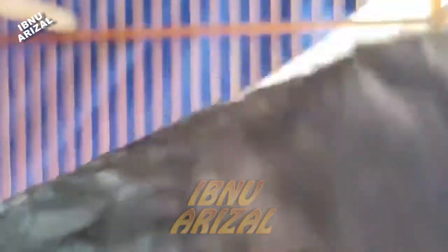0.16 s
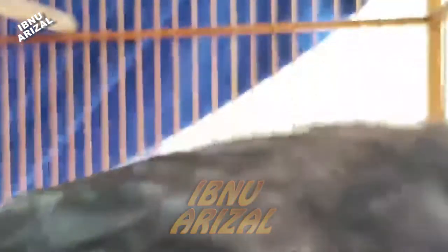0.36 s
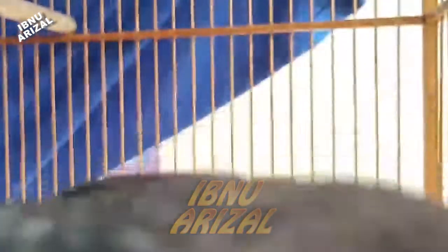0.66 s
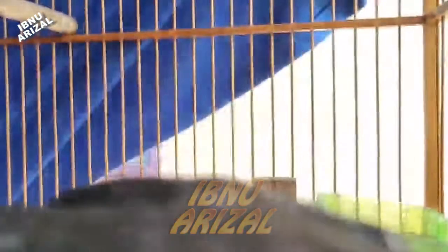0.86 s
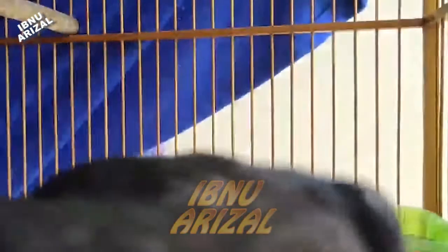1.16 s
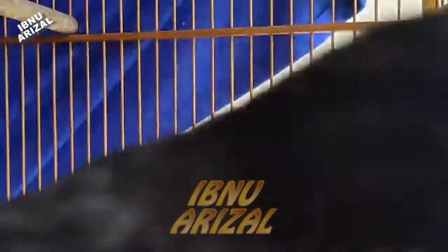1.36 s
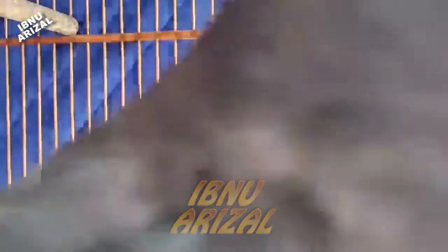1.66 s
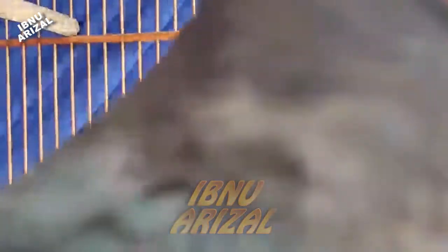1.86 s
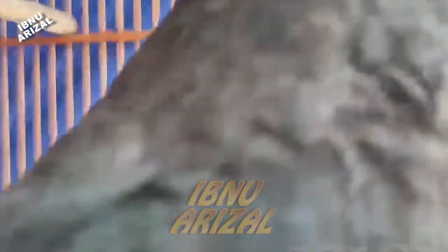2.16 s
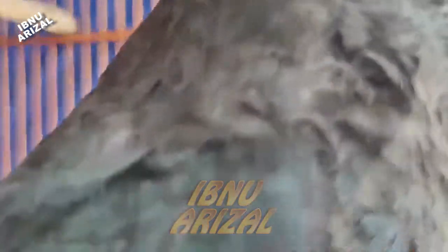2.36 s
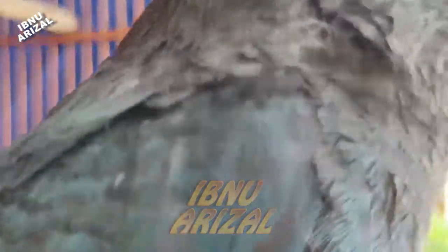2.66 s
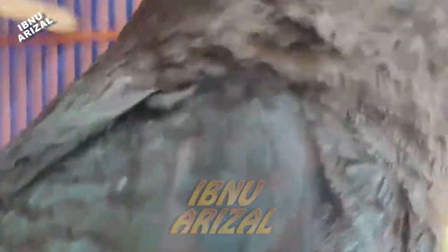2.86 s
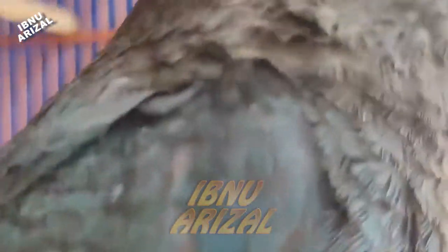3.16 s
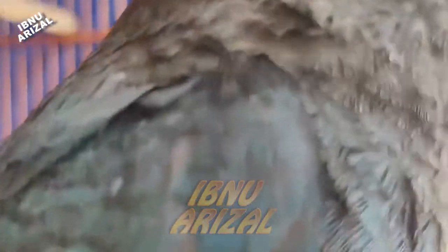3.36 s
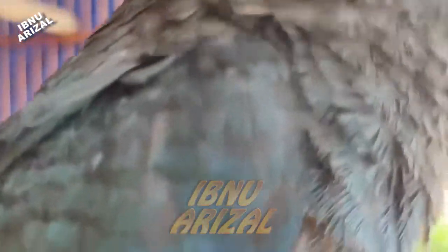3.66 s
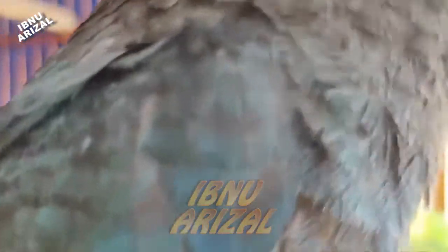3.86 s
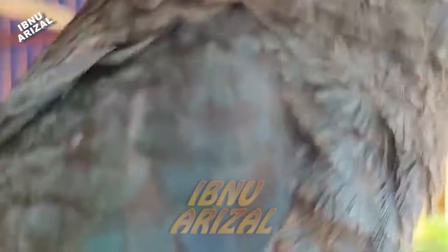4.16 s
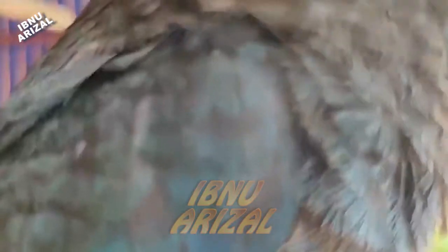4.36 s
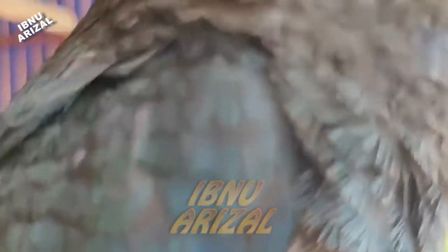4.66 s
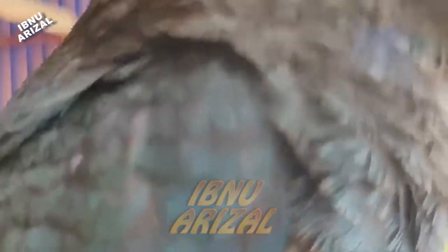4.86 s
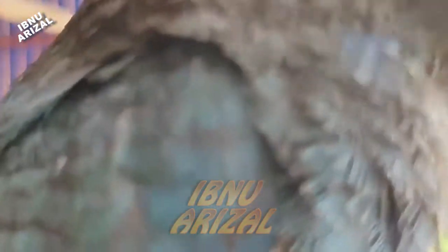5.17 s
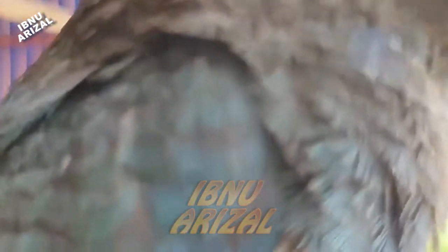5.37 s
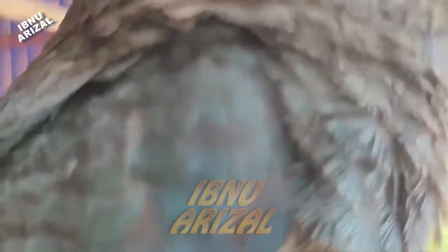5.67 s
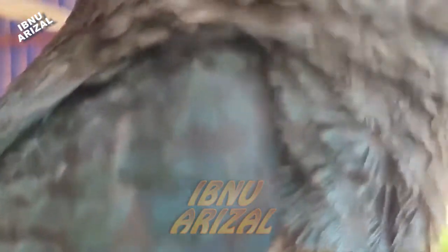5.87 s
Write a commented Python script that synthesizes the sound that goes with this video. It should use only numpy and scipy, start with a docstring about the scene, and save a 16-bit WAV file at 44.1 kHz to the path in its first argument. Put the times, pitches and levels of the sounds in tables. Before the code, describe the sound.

Rapid raspy squawks from one bird, each a few hundredths of a second long and dropping in pitch, with tiny sips of air between. Bright and hissy first, then rounder before a short pause; muffled notes follow, then uneven chatter that steadies and brightens. Close microphone, small live room, soft movement rumble and a quiet noise floor.

```python
"""A harsh rattle, about ten notes a second, right at the microphone: a caged bird in a small room, with one
short pause and a dull, scooping restart. Uneven membrane pulses and gated air fall in pitch through resonances
of windpipe, throat and beak, plus a hiss band; wider beaks sound brighter and raspier. A tiny sip of air
precedes the notes. Bars and body scatter the treble, the room rings, and low rumble and a noise floor lie below."""
import sys
import numpy as np
from scipy import signal
from scipy.fft import rfft, irfft, next_fast_len
from scipy.io import wavfile
from scipy.ndimage import uniform_filter1d, minimum_filter1d

SR = 44100
rng = np.random.default_rng(int(sys.argv[2]) if len(sys.argv) > 2 else 0)


def file_out(sig):
    """Save sig as 16-bit WAV at sys.argv[1]."""
    # one column per channel
    cols = np.atleast_2d(sig).T
    # limit, then scale
    lim = np.clip(cols, -1, 1)
    pcm = np.round(lim * 32767).astype(np.int16)
    wavfile.write(sys.argv[1], SR, pcm)


N = 265570
LEAD = SR // 4  # samples kept ahead of the opening, for the rattle already under way

# rumble of the bird stirring close by: (time [s], level [dB])
STIR = [(0, -51), (.25, -46), (.7, -61), (2.6, -65), (3.8, -66), (4.7, -74), (5.85, -56)]
USUAL_PITCH_HZ, WIDE_BEAK_DB = 1200, -19


def from_db(db):
    """Decibels to gain."""
    return 10 ** (np.asarray(db) / 20)


def rms_one(x):
    """Scale to rms 1."""
    return x / np.sqrt(np.mean(x ** 2) + 1e-20)


def along(rows, at):
    """Read a two-column table along straight lines."""
    return np.interp(at, *np.transpose(rows))


def at_hz(points, hz):
    """Read a spectrum on a log-frequency axis."""
    points = np.array(points)
    return np.interp(np.log(hz + 1e-9), np.log(points[:, 0]), points[:, 1])


def colour(x, spectrum):
    """Filter a sound by a smooth spectrum."""
    n = x.shape[-1]
    size = next_fast_len(n + 2048)
    gain = from_db(at_hz(spectrum, np.fft.rfftfreq(size, 1 / SR)))
    return irfft(rfft(x, size) * gain, size)[..., :n]


def band(x, low_hz, high_hz, order=3):
    """Butterworth band-pass."""
    edges = [low_hz, min(high_hz, SR / 2 - 100)]
    return signal.sosfilt(signal.butter(order, edges, "band", fs=SR, output="sos"), x)


def waver(size, rate_hz):
    """Smooth random drift with rms 1: noise through two equal one-pole low-passes."""
    r = np.exp(-2 * np.pi * rate_hz / SR)
    drift = signal.lfilter([1], [1, -2 * r, r * r], rng.standard_normal(2 * size))
    return rms_one(drift[size:])  # the first half lets the filter settle


def add(out, s, x):
    """Mix a sound in at time s."""
    i = max(LEAD + round(s * SR), 0)
    x = x[..., :max(out.shape[1] - i, 0)]
    out[:, i:i + x.shape[-1]] += x


def posture(s, pitch_hz, beak_db):
    """Length, windpipe level, hiss level and throat centre that go with a note's pitch and gape."""
    # slow course of the rattle at usual pitch and gape:
    # (time [s], note length [s], windpipe level [dB], hiss level [dB])
    course = [(0.05, 0.035, -22.6, -36.8), (0.6, 0.039, -22.5, -37.7), (1.0, 0.033, -20.5, -35.6),
              (1.4, 0.038, -19.7, -48.4), (2.3, 0.034, -24.1, -47.9), (3.3, 0.031, -21.4, -45.7),
              (4.0, 0.034, -21.5, -46.2), (4.8, 0.033, -23.7, -43.8), (5.95, 0.037, -25.4, -42.2)]
    times, *columns = np.transpose(course)
    length, windpipe_db, hiss_db = (np.interp(s, times, column) for column in columns)
    octaves = np.log2(pitch_hz / USUAL_PITCH_HZ)
    gape_db = beak_db + 22  # against the usual beak level of -22 dB
    # a higher note rings more in the windpipe
    windpipe_db = windpipe_db + 4.5 * octaves - .03 * gape_db
    # a lower, slacker note and a wider beak let out more hiss
    hiss_db = hiss_db - 20 * octaves + .58 * gape_db
    # the throat resonance climbs with pitch and gape
    throat_hz = 2570 + 700 * octaves + 15 * gape_db
    return length, windpipe_db, hiss_db, throat_hz


def lateness(pitch_hz, beak_db, half_shut_db=-27, slack_hz=1070):
    """How late the beak opens, 0-1: latest on a taut note with the beak half shut."""
    shut = np.interp(beak_db, [half_shut_db, WIDE_BEAK_DB], [1, 0])
    return shut * np.interp(pitch_hz, [slack_hz, USUAL_PITCH_HZ], [0, 1])


def glide(s, u, late, restart_s=1.271, recovery_s=.31, quick_fall=-.2, late_fall=.15):
    """Pitch ratio at shares u of a note: a fall, blended with a scoop that fades after the restart."""
    # course of a harsh note: (share of its length [0-1], pitch [ratio])
    harsh_course = [(0, 1.22), (.12, 1.07), (.3, 1.0), (.52, .93), (.72, .79), (1.0, .53)]
    # a scooping note dips and recovers before it sinks: (share of its length [1 = whole], pitch [ratio])
    scoop_course = [(0, 1.6), (.13, 1.08), (.28, .93), (.52, 1.07), (.75, .95), (1.1, .6)]
    scoop = np.clip(1 - ((s - restart_s) / recovery_s) ** 2, 0, 1) * (s > restart_s - .05)
    fall = quick_fall + late * (late_fall - quick_fall)  # extra fall over a note, octaves
    plain = along(harsh_course, u) * 2 ** (-fall * (np.minimum(u, 1) - .3))
    return (1 - scoop) * plain + scoop * along(scoop_course, u)


def syrinx(pitch_hz, rough, jitter=.065, jitter_hz=600, shimmer_db=3.5, gating=.5):
    """Uneven pulses of the membranes, and the turbulence that each pulse lets through."""
    size = len(pitch_hz)
    hz = pitch_hz * (1 + jitter * rough * waver(size, jitter_hz))
    phase = 2 * np.pi * np.cumsum(hz) / SR
    k = np.arange(1, 17)[:, None]  # partial numbers
    audible = k * hz < SR / 2
    partials = np.cos(k * phase + rng.uniform(0, 2 * np.pi, k.shape)) * audible
    pulses = partials.sum(axis=0) * from_db(shimmer_db * rough * waver(size, 200))
    air = rng.standard_normal(size) * (1 + gating * np.cos(phase))
    # roughness moves power from pulses to air
    return np.sqrt(1 - rough) * rms_one(pulses), np.sqrt(rough) * rms_one(air)


def throat_resonance(hz, bright_db, unsteady, late, widen_db=1.1, reach_db=.14, late_holds=.8):
    """The throat band slides and widens with gape; a narrow beak, steady note or late beak limits its rise."""
    # throat at a reference centre: (low edge [Hz], high edge [Hz], centre [Hz], width [Hz],
    # rise over a note [octaves], rasp [dB], response to pressure [dB/dB], response to beak opening [ratio],
    # left port's lag before the turn [s], lag after it [s], left-right [dB])
    throat = (1850, 3900, 2470, 600, .32, -3, .6, .5, .000048, .000122, .1)
    low, high, centre, width = np.array(throat[:4]) * hz / 2550
    gape = max(bright_db, 0)
    rise = throat[4] * np.clip(1 + bright_db / 14, 0, 1) * unsteady * (1 - late_holds * late)
    high = high * from_db(reach_db * gape)
    width = width * from_db(widen_db * gape) * np.sqrt(unsteady)
    return (low, high, centre, width, rise, *throat[5:])


def beak_resonance(beak_db):
    """A half-shut beak holds back the top of its band."""
    # beak fully open: (low edge [Hz], high edge [Hz], centre [Hz], width [Hz],
    # rise over a note [octaves], rasp [dB], response to pressure [dB/dB], response to beak opening [ratio],
    # left port's lag before the turn [s], lag after it [s], left-right [dB])
    beak = (3900, 7700, 6350, 1350, .12, -3.5, 1.4, .7, .000042, .000106, 1.0)
    # the upper edge climbs with gape: (beak level [dB], share of the full edge [0-1])
    beak_reach = [(-27, .89), (-21, .94), (-16, 1.0)]
    return (beak[0], beak[1] * along(beak_reach, beak_db), *beak[2:])


def resonate(x, hz, width_hz, size=96):
    """A two-pole resonance whose centre moves, stepped in short blocks."""
    r = np.exp(-np.pi * width_hz / SR)
    out, state = np.zeros(len(x)), np.zeros(2)
    for i in range(0, len(x), size):
        poles = [1, -2 * r * np.cos(2 * np.pi * hz[i] / SR), r * r]
        out[i:i + size], state = signal.lfilter([1, 0, -1], poles, x[i:i + size], zi=state)
    return out


def place(x, lag_s, pan_db):
    """Set a sound between the microphone's ports: the left hears it lag_s later than the right."""
    hz = np.fft.rfftfreq(len(x), 1 / SR)
    late = irfft(rfft(x) * np.exp(-2j * np.pi * hz * lag_s), len(x))
    return np.array([late * from_db(pan_db / 2), x * from_db(-pan_db / 2)])


def scatter(x, scatter_db=-6.0, corner_hz=3800, count=8):
    """Cage bars and the bird's own body throw back a little treble, differently to each port."""
    paths = np.zeros((2, 200))  # 200 samples: under 5 ms of echoes
    for port in paths:
        delays = rng.integers(6, len(port), count)
        port[delays] = rng.choice([-1, 1], count) / np.sqrt(count)
    treble = band(x, corner_hz, 18000, order=1)
    echoes = signal.fftconvolve(treble, paths, axes=1)[:, :x.shape[1]]
    return x + from_db(scatter_db) * echoes


def puff(s, size, level_db, follows_stir=.12, usual_stir_db=-66):
    """Turbulent air brushing the close ports, a little stronger on the left and as the bird stirs."""
    # air stirred close to the microphone: (frequency [Hz], level [dB per Hz])
    puff_spectrum = [(25, -11), (80, -2), (550, -1), (3000, -38)]
    noise = rng.standard_normal((2, size)) + rng.standard_normal(size)  # partly shared by the ports
    air = rms_one(colour(noise, puff_spectrum)) * from_db([[1], [-1]])
    near_db = follows_stir * (along(STIR, s) - usual_stir_db)
    return air * from_db(level_db + near_db)


def note(row, shut_db=-20, puff_db=-31, puff_growth=1.5, rough_start=.6, rough_growth=1.2,
         voice_db=-.1, length_spread=.03, quick_opening_s=.0006, late_opening_s=.009,
         opening_sweep=.9, opening_sweep_s=.015):
    """One squawk: membrane pulses and air drive four parallel resonances, with a puff of air beside them."""
    # windpipe, then hiss: (low edge [Hz], high edge [Hz], centre [Hz], width [Hz],
    # rise over a note [octaves], rasp [dB], response to pressure [dB/dB], response to beak opening [ratio],
    # left port's lag before the turn [s], lag after it [s], left-right [dB])
    windpipe = (520, 1900, 1190, 1300, 0, -5.5, .7, 0, .000105, .000105, -2.2)
    hiss = (8400, 15000, 10500, 3400, 0, 0.0, 1.2, .5, .000062, .000055, 2.0)
    # air pressure behind a note: (share of its length [1 = whole], level [dB])
    pressure = [(0, -12), (.03, -1.5), (.14, 0), (.57, -1), (.75, -5), (.91, -9), (1.03, -20), (1.3, -44)]
    # the wider the beak, the rougher the note: (beak level [dB], roughness [0-1])
    roughness = [(-53, .28), (-35, .38), (-22, .48), (-15, .44)]
    # a strongly ringing throat steadies the membranes: (throat level [dB], share of roughness left [0-1])
    steadying = [(-15, 1), (-12, .5), (-9, .22)]
    # the bird turns at the microphone: (time [s], share of the turn [0-1])
    turning = [(0, .7), (1.5, 0), (4.0, 0), (5.0, 1.0)]
    # the head sways from side to side: (time [s], left-right [dB])
    sway = [(0, -.2), (1.3, -1.0), (1.8, .5), (2.2, 2.4), (2.8, 1.2), (3.7, -.2), (6, -.3)]

    s, pitch, throat_db, beak_db = row
    length, windpipe_db, hiss_db, throat_hz = posture(s, pitch, beak_db)
    length = length * (1 + length_spread * rng.standard_normal())
    t = np.arange(3072) / SR
    u = t / length  # share of the note's length
    unsteady = along(steadying, throat_db)
    late = lateness(pitch, beak_db) * np.clip(unsteady, 0, 1)

    # the membranes grow unsteady as they slacken
    growth = rough_start + rough_growth * u
    rough = np.clip(along(roughness, beak_db) * unsteady * growth, .02, .92)
    pulses, air = syrinx(pitch * glide(s, u, late), rough)
    # past the table's end the pressure drops 60 dB per note length
    pressure_db = along(pressure, u) - 60 * np.maximum(u - pressure[-1][0], 0)

    # a late beak opens gradually and sweeps its resonances up from below
    closed = np.clip(1 - (t / (quick_opening_s + late * late_opening_s)) ** 2, 0, 1)
    sweep = opening_sweep * late * np.clip(1 - t / opening_sweep_s, 0, 1)  # octaves
    turn = np.clip(along(turning, s), 0, 1)
    bright_db = beak_db - windpipe_db
    throat = throat_resonance(throat_hz, bright_db, unsteady, late)
    resonances = windpipe, throat, beak_resonance(beak_db), hiss
    levels_db = windpipe_db, throat_db, beak_db, hiss_db

    out = 0
    for resonance, level_db in zip(resonances, levels_db):
        low, high, hz, width, rise, rasp_db, by_pressure, by_beak, lag_before, lag_after, pan_db = resonance
        drive_db = by_pressure * pressure_db + by_beak * shut_db * closed
        drive = (pulses + from_db(rasp_db) * air) * from_db(drive_db)
        # where a rise is set, the resonance climbs while the pitch falls
        centre = hz * 2 ** (rise * (np.minimum(u, 1) - .3) - by_beak * sweep)
        ring = resonate(band(drive, low, high, order=4), centre, width)
        # the level refers to the note's length, not to the whole buffer
        ring = rms_one(ring) * np.sqrt(length / t[-1]) * from_db(voice_db + level_db)
        lag = lag_before + turn * (lag_after - lag_before)
        out = out + place(ring, lag, pan_db + along(sway, s))

    # the wider the beak, the more air brushes the ports
    breath_db = puff_db + windpipe_db + puff_growth * max(bright_db, -5) + .5 * pressure_db
    return scatter(out) + puff(s, len(t), breath_db)


def room(x, build_s=.012, likeness=.4):
    """Dense reflections that swell briefly and die faster in the treble."""
    # colour of the room's ring: (frequency [Hz], level [dB])
    room_colour = [(100, -19), (480, -14.5), (1200, -22), (2500, -23), (3600, -18), (6500, -19.5),
                   (12000, -27)]
    # decay of the ring: (frequency [Hz], time to fall 60 dB [s])
    room_decay = [(1200, .4), (2500, .36), (6500, .34), (14000, .18)]
    t = np.arange(SR * 3 // 4) / SR
    edges = np.geomspace(60, 17000, 11)
    white = rng.standard_normal((2, len(t))) + likeness * rng.standard_normal(len(t))
    tail = 0
    for low, high in zip(edges, edges[1:]):
        decay_s = at_hz(room_decay, np.sqrt(low * high))
        fade = from_db(-60 * t / decay_s) * (1 - np.exp(-t / build_s))
        tail = tail + band(white, low, high) * fade / np.linalg.norm(fade)
    return signal.fftconvolve(x, colour(tail, room_colour), axes=1)[:, :x.shape[1]]


def steady(spectrum):
    """Partly shared noise at the two ports, 4 dB stronger on the left."""
    noise = rng.standard_normal((2, N)) + rng.standard_normal(N)
    return rms_one(colour(noise, spectrum)) * from_db([[2], [-2]])


def rumble():
    """Low noise whose level follows the bird's movements."""
    # low rumble as the bird moves: (frequency [Hz], level [dB per Hz])
    rumble_spectrum = [(25, -10), (100, 0), (250, -11), (800, -35)]
    return steady(rumble_spectrum) * from_db(along(STIR, np.arange(N) / SR))


def background():
    """Constant noise floor, strongest in the low end."""
    # background: (frequency [Hz], level [dB per Hz])
    floor_spectrum = [(25, -10), (90, 0), (300, -12), (900, -4), (2500, -14), (15000, -42)]
    return steady(floor_spectrum) * from_db(-66)


def sip(length=.004, start_hz=650, end_hz=1300, noise=.3):
    """A faint rising chirp as the bird draws air through the syrinx."""
    size = int(length * SR)
    tone = np.sin(2 * np.pi * np.cumsum(np.linspace(start_hz, end_hz, size)) / SR)
    breath = rms_one(band(rng.standard_normal(size), 600, 2500, order=4))
    return (tone + noise * breath) * np.hanning(size)


def thump(size=1024):
    """A stronger puff of air that hits the ports: a short swell of low noise."""
    return rms_one(band(rng.standard_normal((2, size)), 60, 260, order=2)) * np.hanning(size)


def bird(sip_db=-42, sip_ahead=.014, beat=.095):
    """The rattle is already under way; after the pause it restarts with a longer draw of air."""
    # notes close to the microphone; the beak's level tells how wide it gapes:
    # (time [s], pitch at glide ratio 1 [Hz], throat level [dB], beak level [dB])
    notes = [(0.0494, 1430.0, -19, -14), (0.144, 1420.0, -20, -16), (0.2396, 1390.0, -19, -17),
             (0.336, 1330.0, -20, -16), (0.4359, 1300.0, -19, -18), (0.5277, 1320.0, -21, -16),
             (0.6185, 1350.0, -23, -15), (0.7124, 1290.0, -17, -19), (0.806, 1240.0, -13, -21),
             (0.8995, 1200.0, -11, -26), (0.9992, 1180.0, -9, -35), (1.271, 950.0, -29, -53),
             (1.3844, 1150.0, -33, -53), (1.4843, 1200.0, -37, -52), (1.5842, 1250.0, -38, -49),
             (1.6785, 1140.0, -22, -39), (1.7671, 1130.0, -16, -25), (1.8644, 1240.0, -18, -27),
             (1.9548, 1090.0, -26, -32), (2.0505, 1190.0, -16, -22), (2.1428, 1160.0, -17, -19),
             (2.2376, 1180.0, -15, -20), (2.3408, 1180.0, -16, -20), (2.436, 1210.0, -16, -20),
             (2.5301, 1220.0, -14, -24), (2.6353, 1200.0, -24, -29), (2.7439, 1170.0, -17, -33),
             (2.842, 1150.0, -17, -22), (2.9392, 1230.0, -17, -24), (3.0426, 1180.0, -14, -26),
             (3.1443, 950.0, -19, -27), (3.2468, 1150.0, -26, -36), (3.3469, 1280.0, -16, -23),
             (3.4564, 1180.0, -22, -31), (3.5655, 1180.0, -21, -33), (3.6628, 1000.0, -24, -23),
             (3.7723, 1100.0, -27, -41), (3.8757, 1150.0, -25, -35), (3.9783, 890.0, -31, -26),
             (4.0852, 1090.0, -16, -22), (4.1888, 1140.0, -16, -23), (4.2915, 1090.0, -14, -29),
             (4.3902, 1000.0, -19, -27), (4.4945, 1210.0, -16, -23), (4.5916, 1170.0, -13, -20),
             (4.6871, 1200.0, -14, -20), (4.785, 1180.0, -14, -20), (4.881, 1230.0, -13, -18),
             (4.9809, 1280.0, -14, -17), (5.0805, 1300.0, -14, -18), (5.1798, 1270.0, -14, -17),
             (5.2778, 1270.0, -15, -17), (5.3762, 1290.0, -15, -17), (5.4724, 1260.0, -14, -18),
             (5.573, 1270.0, -15, -18), (5.667, 1300.0, -17, -16), (5.7603, 1290.0, -17, -16),
             (5.8537, 1310.0, -17, -15), (5.9527, 1290.0, -17, -16)]
    out = np.zeros((2, LEAD + N))
    add(out, notes[0][0] - beat, note(notes[1]))  # begins before the opening
    for row in notes:
        add(out, row[0], note(row))
        sip_s = row[0] - sip_ahead + rng.normal(0, .001)
        add(out, sip_s, sip() * from_db(sip_db + rng.normal(0, 2)))
    add(out, 1.252, sip(length=.024, start_hz=500, end_hz=1900, noise=.2) * from_db(-39))
    add(out, 2.14, thump() * from_db(-37))
    return out


def scene():
    """The bird, its room, a low rumble as it moves and the background."""
    call = bird()
    return (call + room(call))[:, LEAD:] + rumble() + background()


def limit(x, ceiling=.85, size=128):
    """Turn the level down for a few milliseconds around each peak that would pass the ceiling."""
    gain = ceiling / np.maximum(np.abs(x).max(axis=0), ceiling)
    return x * uniform_filter1d(minimum_filter1d(gain, 2 * size), size)


def record(dry, cutoff_hz=15700):
    """Microphone colour and limiter, then a steep low-pass cuts the top."""
    # microphone colour: (frequency [Hz], level [dB])
    mic_colour = [(4000, 0), (4900, 1.8), (5550, -3), (6400, 1.8), (8600, -1.5), (10600, 4.5),
                  (12700, -3.5), (15000, 3.5)]
    low_pass = signal.ellip(10, .2, 80, cutoff_hz, fs=SR, output="sos")
    return signal.sosfilt(low_pass, limit(colour(dry, mic_colour)))


dry = scene()
out = record(dry)
file_out(out)
```